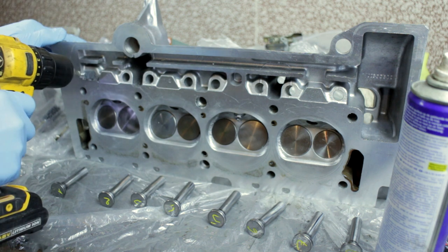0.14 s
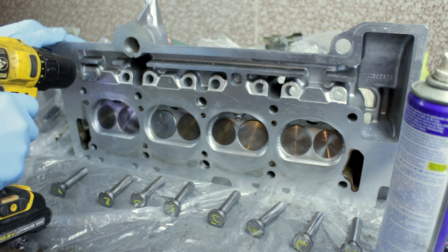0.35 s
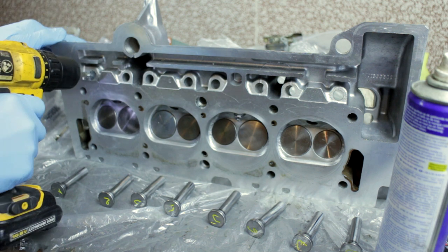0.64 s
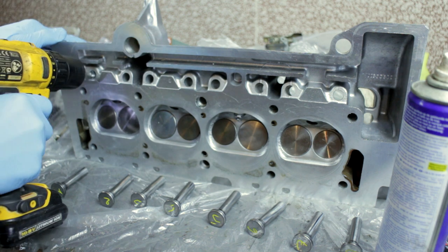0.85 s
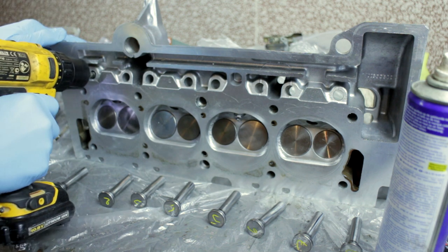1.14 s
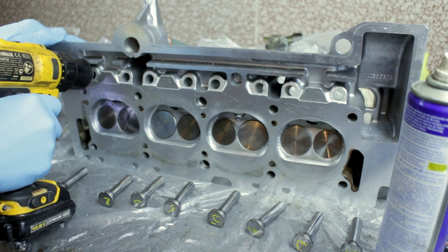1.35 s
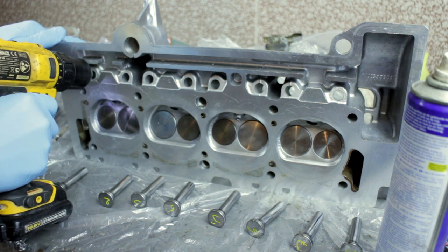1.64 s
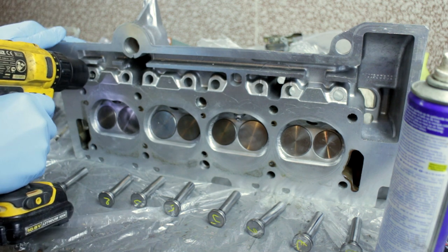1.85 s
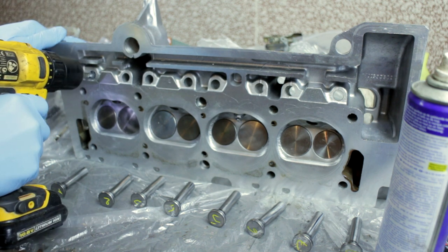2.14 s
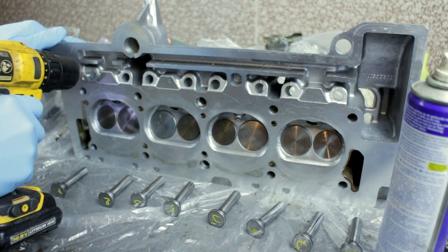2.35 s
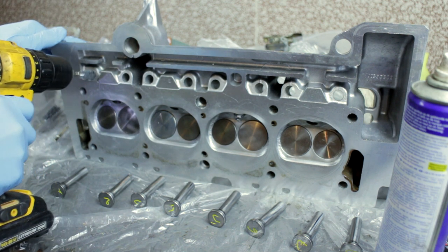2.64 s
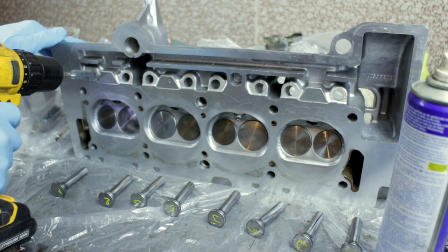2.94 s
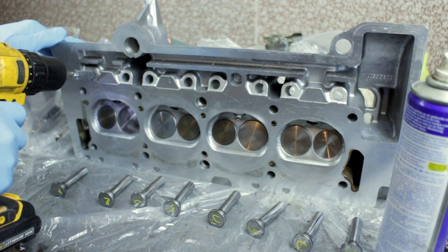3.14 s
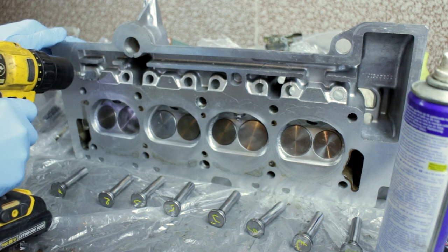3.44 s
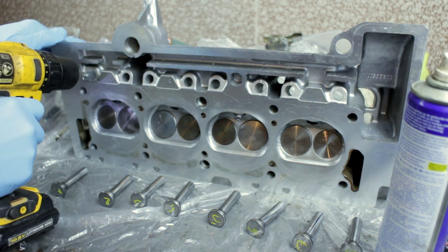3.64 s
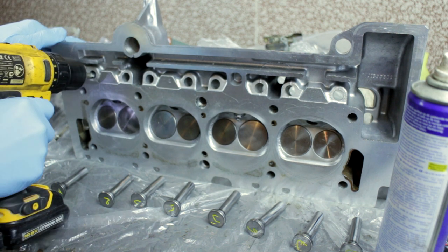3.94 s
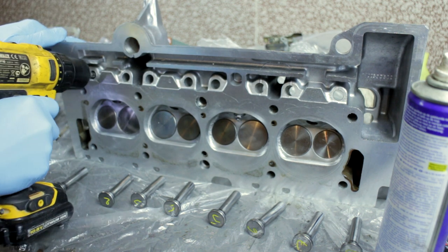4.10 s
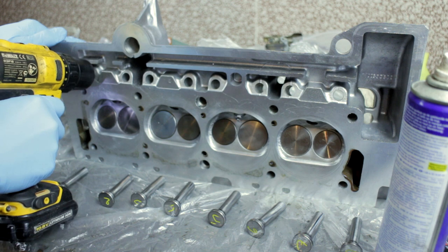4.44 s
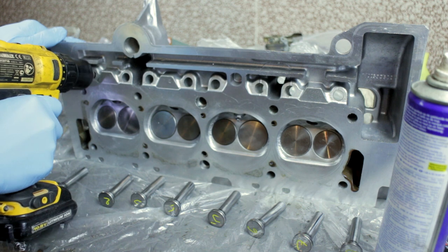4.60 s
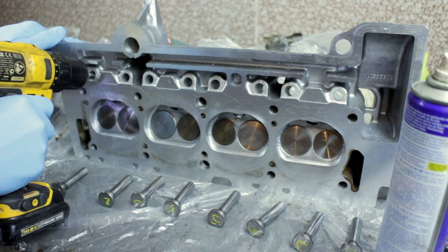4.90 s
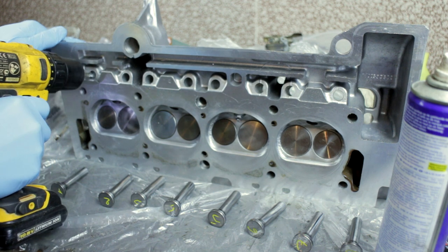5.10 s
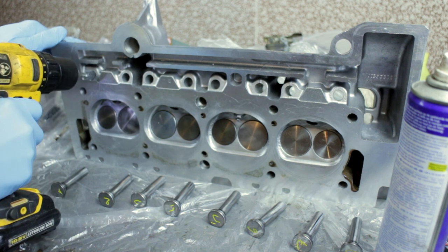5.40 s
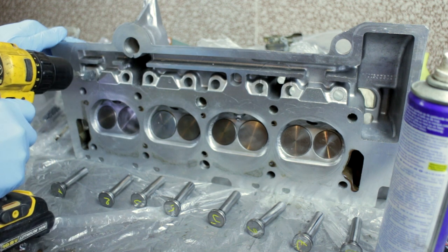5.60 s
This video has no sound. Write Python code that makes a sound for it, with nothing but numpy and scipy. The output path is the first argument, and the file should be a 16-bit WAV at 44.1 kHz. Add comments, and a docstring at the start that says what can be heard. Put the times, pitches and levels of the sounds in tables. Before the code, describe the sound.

A cordless drill runs a honing brush in an engine part, with rattling gears, scratchy scrubbing, thin squeals and one brief slowdown.

```python
"""Cordless drill honing a bore.

A drill spins an abrasive brush in a narrow bore of an aluminium cylinder head, on a workshop bench. The motor
revs up, settles, sags once as the brush is drawn back, and recovers; its planetary gears whine and rattle.
Bristles scrub the wall and ring the casting; the air in the bore squeals, gliding in pitch as the brush
travels, and brief gear and shaft whistles glide alongside. Mains hum lies underneath."""
import sys
import numpy as np
from scipy import signal
from scipy.fft import rfft, irfft, next_fast_len
from scipy.io import wavfile
from scipy.ndimage import uniform_filter1d

SR = 44100
rng = np.random.default_rng(int(sys.argv[2]) if len(sys.argv) > 2 else 0)


def put_to_file(sound):
    """Save the sound as 16-bit audio at rate SR, in the file named by the first command-line argument."""
    columns = np.atleast_2d(sound).T  # one column per channel
    safe = np.clip(columns, -1, 1)
    whole_steps = np.round(safe * 32767)
    wavfile.write(sys.argv[1], SR, whole_steps.astype(np.int16))


N = 253910
TIME_S = np.arange(N) / SR
TEETH_PER_TURN, CARRIER_PER_TURN = 11.138, .3125
WORKING_HZ = 184, 204  # shaft labouring, running free

# Motor shaft speed: time_s, shaft_hz
SHAFT_SPEED = [(0, 129.4), (.12, 130), (.18, 183), (.21, 187), (.235, 218), (.26, 244), (.29, 255),
               (.34, 260), (.39, 246), (.48, 213.4), (.61, 189.2), (.65, 185), (.69, 184.2), (1.32, 184.3),
               (1.39, 186.1), (1.46, 189.3), (1.56, 192), (1.69, 193.2), (1.79, 196.3), (2.04, 197.4),
               (2.43, 204.8), (2.53, 200.4), (2.62, 198.2), (2.88, 206.6), (2.96, 201.4), (3.21, 144.7),
               (3.29, 150.6), (3.43, 190.7), (3.6, 200.6), (3.68, 203.1), (4.17, 202.1), (4.51, 205.5),
               (4.72, 198.5), (5.05, 191.1), (5.33, 192.3), (5.52, 195.7), (5.64, 195.8), (5.76, 199.6)]
# Main whine, 3x shaft: time_s, level_db
MOTOR_WHINE = [(0, -74), (.14, -64), (.2, -43), (.27, -51.5), (.37, -53), (.41, -48), (.46, -46),
               (.65, -47), (.71, -55.5), (.8, -51.5), (.86, -62), (.97, -51.5), (1.07, -62), (1.17, -52.5),
               (1.27, -57), (1.35, -49), (1.46, -45), (1.55, -50.5), (1.88, -44.5), (2.28, -47),
               (2.39, -46.5), (2.51, -47), (2.94, -45), (3.25, -61), (3.44, -44), (3.49, -49.5),
               (3.58, -45), (4.61, -42.5), (4.7, -45), (4.92, -45.5), (4.96, -52.5), (5.01, -51),
               (5.29, -49), (5.37, -54), (5.61, -46), (5.76, -45.5)]
# Housing howl when racing, 9x shaft: start_s, end_s, level_db
HOWLS = [(0.22, 0.3, -47), (0.396, 0.445, -46.5)]
# Other motor tones: shaft_multiple, labouring_db, free_db, slack_db
SHAFT_TONES = [(1, -71, -72, -72), (2, -73, -73, -73), (4, -72, -62, -62), (5, -69, -64, -68),
               (6, -62, -63, -61.5), (7, -74, -70, -62), (8, -66, -65, -61), (9, -68, -67, -58),
               (10, -68, -64, -64), (13, -58, -64, -66), (15, -61, -60, -61), (16, -65, -64, -64),
               (18, -59, -60, -65), (19, -58, -64, -67), (21, -61, -63, -67), (23, -64, -62, -61),
               (24, -64, -58, -59), (25, -53.5, -51, -56.5), (26, -63, -64, -57), (27, -59, -59, -60),
               (28, -53, -60, -68), (29, -61, -59, -58), (30, -72, -70, -66), (31, -55, -59, -61),
               (33, -65, -62, -68), (34, -67, -65, -70), (35, -64, -68, -72), (36, -68, -70, -67),
               (38, -67, -69, -70), (54, -76, -71, -75), (57, -80, -68, -74), (60, -76, -66, -71),
               (66, -78, -72, -72)]
# Dip of the upper motor tones in the opening rev: start_s, end_s, gain_db
REV_DIP = [(.15, .66, -4.5)]
# Drill housing resonances and dips: centre_hz, width_hz, gain_db
HOUSING_MODES = [(230.8, 13.5, 13), (763, 37, -5), (893, 74, 6), (1034, 84, -5.5), (1310, 60, 5),
                 (2050, 370, 6.5), (5260, 75, 1.5), (5230, 67, 4), (5980, 50, 3.5)]
# Gear tones below and above the tooth rate, and at 12x shaft: time_s, lower_db, upper_db, twelfth_db
GEAR_TONES = [(0, -70, -71, -74), (.45, -58, -60, -56), (.57, -49, -55, -61), (.68, -46.5, -55, -58),
              (.9, -46.5, -45, -60), (1.05, -46.5, -47, -55), (1.25, -47.5, -46, -57),
              (1.37, -63, -49, -59), (1.58, -61, -52, -55), (1.8, -58, -48, -50), (1.96, -61, -57, -51),
              (2.09, -59, -49, -53), (2.3, -55, -59, -53), (2.42, -51, -61, -63), (2.65, -57, -66, -53),
              (3.0, -64, -67, -57), (3.22, -61, -65, -62), (3.5, -52, -62, -50), (3.75, -50.5, -57, -63),
              (3.97, -54, -54, -53), (4.2, -49, -50.5, -54), (4.48, -60, -60, -53), (4.65, -66, -55, -51),
              (4.93, -62, -49, -50), (5.07, -61, -53, -53), (5.37, -52, -54, -57), (5.5, -53, -66, -55),
              (5.76, -61, -60, -50)]
# Gearbox response: tooth_hz, mesh_db, overtone_db
GEARBOX_RESPONSE = [(1600, -50, -56), (2050, -49.5, -50.5), (2060, -52, -53), (2190, -61, -53),
                    (2240, -56, -52.5), (2320, -49, -56), (2550, -47, -48), (2900, -60, -53)]
# Mesh overtones split by the planets: tooth_multiple, carrier_steps, labouring_db, free_db
SIDEBANDS = [(2, -2, -6.5, -1.5), (2, 0, -1.5, .5), (2, 2, -10, -8), (3, -1, -13, -12), (3, 1, -17, -12),
             (3, 3, -17, -14)]
# Rattle at 1x, 2x, 3x tooth rate: width_hz, gain_db
RATTLE_BANDS = [(250, -4), (171, -8), (280, -16)]
# Gears slack, brush at the mouth: start_s, end_s, gain_db
SLACK_SPELLS = [(-.2, .18, -7.5), (2.76, 3.38, -10)]
# Brush binding: start_s, end_s, gain_db
BIND_SPELLS = [(.55, .65, 16), (1.96, 2.74, 10.5), (3.4, 4.2, 8), (5.08, 5.7, 8.5)]
# Bristles on the wall: time_s, pressure_db, fizz_db
SCRUB_LEVELS = [(0.0, -45.5, -52), (0.11, -43, -55), (0.29, -39, -47), (0.64, -41, -54.5),
                (0.79, -40, -53.5), (1.44, -40.5, -55.5), (1.59, -40, -52.5), (2.55, -41, -51),
                (3.15, -47, -56.5), (3.29, -44, -54.5), (3.48, -43, -55), (3.93, -40.5, -54.5),
                (4.46, -41, -60), (4.79, -40.5, -53), (5.52, -41.5, -53.5), (5.76, -44.5, -53)]
# Scrub spectrum: freq_hz, gain_db
SCRUB_SPECTRUM = [(150, -21), (320, -19.5), (430, -12), (600, -1.5), (800, -10), (920, -6), (1050, -11),
                  (1160, -5.5), (1350, -7), (1550, -2.5), (1780, -5), (2200, 2.5), (2700, -2), (3400, 1),
                  (3900, -1), (4400, -2), (4900, 0.5), (5150, 1), (5380, 3), (5650, -3.5), (6300, -9.5),
                  (8000, -9.5), (16000, -27.5)]
# Fizz spectrum: freq_hz, gain_db
FIZZ_SPECTRUM = [(4000, -45), (7000, -36), (10300, -3), (11700, 0), (12200, 3.5), (13000, 2.5),
                 (13700, 2.5), (16000, -2.5)]
# Spectra of bristle bite, commutator buzz, stem rub and shake: freq_hz, gain_db
BITE_SPECTRUM = [(3000, -47), (6700, 5.5), (8300, -4.5), (10500, -4), (12500, -12)]
BUZZ_SPECTRUM = [(6150, -16), (6600, -7), (7200, -11), (9500, -14), (11500, 3), (16000, 6)]
RUB_SPECTRUM = [(250, -37), (480, -6), (750, -6), (1700, -2.5), (2200, 5.5), (3000, -9), (4300, -19),
                (5600, 3.5), (7000, -14), (9000, -50)]
SHAKE_SPECTRUM = [(25, -28), (55, -18), (90, -8), (160, 10), (200, -4), (320, -2), (600, -36)]
# Gliding squeals: the air in the bore, plus a few brief gear and shaft whistles of like shape: start_s, end_s,
# from_hz, to_hz, width_hz, level_db
GLIDING_SQUEALS = [(-.05, .16, 1977, 1894, 30, -52.5), (-.05, 0.164, 2910, 2850, 60, -60.5),
                   (.22, 0.418, 2643, 3030, 70, -52.5), (.24, .39, 4700, 4980, 60, -45.5),
                   (.37, .475, 5400, 5000, 90, -47), (.34, .5, 2880, 2460, 70, -56),
                   (.51, 0.592, 3070, 3220, 35, -53), (.67, .86, 3330, 3260, 40, -58),
                   (.83, 1.0, 3310, 3330, 35, -52), (0.968, 1.09, 3320, 3180, 30, -53),
                   (1.13, 1.29, 3190, 3120, 50, -57), (1.078, 1.317, 1513, 1114, 55, -58),
                   (2.522, 2.826, 3285, 2110, 90, -55), (2.76, 2.94, 11100, 11100, 70, -63),
                   (2.796, 3.123, 2050, 1160, 55, -66), (3.489, 3.75, 2580, 3380, 80, -53.5),
                   (4.083, 4.26, 1390, 1126, 40, -61), (5.451, 5.796, 3410, 2236, 100, -55)]
# Casting modes that lift a passing squeal: centre_hz, width_hz, gain_db
CASTING_MODES = [(1210, 250, 10), (2450, 150, 11), (2850, 130, 8.5), (3200, 120, 4), (3550, 120, 7)]
# Brush deep in the bore: start_s, end_s, gain_db
DEEP_SPELLS = [(.62, 1.65, 5.5), (1.65, 2.15, 14), (2.15, 2.6, 10), (4.66, 5.3, 12.5), (5.28, 5.8, 7)]
# Low casting modes rung by the bristles: centre_hz, width_hz, level_db
LOW_MODES = [(1178, 36, -65.5), (1261, 58, -68)]


def gain_of(db):
    """Decibels to amplitude."""
    return 10 ** (np.asarray(db) / 20)


def unit_rms(x):
    """Scale to rms 1."""
    return x / np.sqrt(np.mean(x ** 2) + 1e-20)


def curves(rows):
    """Columns of a timed table, interpolated per sample."""
    time_s, *columns = np.transpose(rows)
    return [np.interp(TIME_S, np.sort(time_s), column) for column in columns]


def spells_db(rows, ramp_s=0.16):
    """Gain that ramps in and out round each spell."""
    return sum(db * np.clip(np.minimum(TIME_S - start_s, end_s - TIME_S) / ramp_s + .5, 0, 1)
               for start_s, end_s, db in rows)


def lift_db(hz, modes):
    """Gain of a tone passing through resonances."""
    return sum(db / (1 + (2 * (hz - centre_hz) / width_hz) ** 2) for centre_hz, width_hz, db in modes)


def wander(rate_hz):
    """Random drift up to about rate_hz; rms 1."""
    steps = rng.standard_normal(8192)
    return unit_rms(np.interp(TIME_S * 2 * rate_hz, np.arange(len(steps)), steps))


def coloured(x, spectrum):
    """Filter by a spectrum drawn over log frequency; rms 1."""
    hz, db = np.transpose(spectrum)
    size = next_fast_len(N)
    bins_hz = np.fft.rfftfreq(size, 1 / SR)
    response = gain_of(np.interp(np.log(bins_hz + 1), np.log(hz), db))
    return unit_rms(irfft(rfft(x, size) * response, size)[:N])


def ringing(hz, width_hz, steady=0):
    """Noise-driven resonance at hz, fixed or gliding; steady (0-1) limits its swings; rms 1."""
    if np.isscalar(hz):
        hz = np.full(N, hz)
    pole = np.exp(-np.pi * width_hz / SR)
    noise = (rng.standard_normal(N) + 1j * rng.standard_normal(N))[:len(hz)]
    envelope = signal.lfilter([1], [1, -2 * pole, pole * pole], noise)
    envelope /= abs(envelope) ** steady
    return unit_rms((envelope * np.exp(2j * np.pi * np.cumsum(hz) / SR)).real)


def tone(multiple, shaft_hz, turns, waver_db, waver_hz, modes=HOUSING_MODES, in_step=False):
    """Shaft-locked tone of wavering level; tones in step beat as pulses."""
    level_db = lift_db(multiple * shaft_hz, modes) + waver_db * wander(waver_hz)
    cycles = multiple * turns + rng.random() * (not in_step)
    return np.sqrt(2) * gain_of(level_db) * np.cos(2 * np.pi * cycles)


def motor(shaft_hz, turns, flutter_db=-19, howl_fade_s=0.011, judder_cycles=.07, switching_hz=7802):
    """Whine, howl bursts, shaft harmonics roughened by slack gears, and the controller's switching."""
    whine = tone(3, shaft_hz, turns, waver_db=1.36, waver_hz=25.84)
    whine += gain_of(flutter_db) * ringing(3 * shaft_hz, width_hz=47)
    whine *= gain_of(curves(MOTOR_WHINE)[0])
    bursts = sum(gain_of(db) * np.clip(np.minimum(TIME_S - start_s, end_s - TIME_S) / howl_fade_s, 0, 1)
                 for start_s, end_s, db in HOWLS)
    howl = bursts * tone(9, shaft_hz, turns, waver_db=2.5, waver_hz=90.6)
    sag_octaves = np.maximum(np.log2(np.median(shaft_hz) / shaft_hz), 0)
    slack = spells_db(SLACK_SPELLS) / spells_db(SLACK_SPELLS).min()
    judder = judder_cycles * slack * wander(70)
    harmonics = np.zeros(N)
    for k, labouring_db, free_db, slack_db in SHAFT_TONES:
        # Slack and slowing: low multiples of three last; unbalance (k <= 2) fades most.
        db_per_octave = 18 * min(k / 30, 1.5) ** 2 + 14 * (k % 3 > 0) + 36 * (k <= 2)
        idle_db = slack_db - sag_octaves * db_per_octave
        loaded_db = np.interp(shaft_hz, WORKING_HZ, [labouring_db, free_db])
        level_db = (1 - slack) * loaded_db + slack * idle_db
        if k > 20:
            level_db += spells_db(REV_DIP)
        harmonics += gain_of(level_db) * tone(k, shaft_hz, turns + judder / k, waver_db=2, waver_hz=7)
    switching = np.sqrt(2) * np.sin(2 * np.pi * switching_hz * TIME_S) * gain_of(-68.5 + 2 * wander(3))
    return whine + howl + harmonics + switching


def commutator(shaft_hz, turns, level_db=-59, size=1024):
    """Fine ticks repeat each turn: a drifting treble comb that fades as the shaft slows."""
    multiple = np.arange(size // 2 + 1)
    weights = (multiple > 31) * (multiple < 84) * (1 + 2 * np.exp(-abs(multiple - 32) / 4))
    patterns = irfft(weights * np.exp(2j * np.pi * rng.random((4, len(multiple)))))
    shares = np.array([wander(2) for _ in patterns])
    shares /= np.linalg.norm(shares, axis=0)
    ticks = sum(np.interp(turns % 1, np.arange(size) / size, pattern) * share
                for pattern, share in zip(patterns, shares))
    fade = np.minimum(shaft_hz / np.median(shaft_hz), 1) ** 3
    return gain_of(level_db) * fade * coloured(ticks, BUZZ_SPECTRUM)


def gear_whine(shaft_hz, turns):
    """Three tones near the tooth rate beat into a rasp; load shifts strength among them."""
    multiples = TEETH_PER_TURN - CARRIER_PER_TURN, TEETH_PER_TURN + CARRIER_PER_TURN, 12
    return sum(gain_of(db) * tone(k, shaft_hz, turns, waver_db=0.8, waver_hz=18, modes=[], in_step=True)
               for k, db in zip(multiples, curves(GEAR_TONES)))


def planetary_gears(shaft_hz, turns, sideband_db=-3, knock_db=-19, bind_share=0.61, pulse_depth=0.31):
    """Pulsing rattle, split overtones and a rough haze of lines at carrier spacing round the tooth rate;
    binding lifts the upper bands."""
    tooth_hz = TEETH_PER_TURN * shaft_hz
    response_hz, *responses_db = np.transpose(GEARBOX_RESPONSE)
    slack_db, bind_db = spells_db(SLACK_SPELLS), spells_db(BIND_SPELLS)
    mesh_db, overtone_db = [np.interp(tooth_hz, response_hz, db) + slack_db for db in responses_db]
    pulsing = unit_rms(1 + pulse_depth * np.cos(2 * np.pi * 2 * CARRIER_PER_TURN * turns))
    rattle, sidebands, knock = np.zeros((3, N))
    for k, (width_hz, db) in enumerate(RATTLE_BANDS, 1):
        band_db = mesh_db if k == 1 else overtone_db + bind_db
        rattle += gain_of(band_db + db) * pulsing * ringing(k * tooth_hz, width_hz)
    for k, step, *working_db in SIDEBANDS:
        multiple = k * TEETH_PER_TURN + step * CARRIER_PER_TURN
        load_db = overtone_db + bind_share * bind_db + np.interp(shaft_hz, WORKING_HZ, working_db)
        line = tone(multiple, shaft_hz, turns, waver_db=0.8, waver_hz=30, in_step=True)
        sidebands += gain_of(load_db + sideband_db) * line
    for step in range(-7, 8):
        multiple = TEETH_PER_TURN + step * CARRIER_PER_TURN
        knock += gain_of(mesh_db + knock_db) * tone(multiple, shaft_hz, turns, waver_db=3, waver_hz=6)
    return rattle + sidebands + knock


def brush(turns, throb_depth=0.036, catch_db=0.55, grit_db=1, bite_exponent=5.1):
    """Grit contacts scrub the wall, throbbing with the gearbox and catching unevenly."""
    pressure_db, fizz_db = curves(SCRUB_LEVELS)
    slack_db = spells_db(SLACK_SPELLS)
    throb = 1 + throb_depth * np.cos(2 * np.pi * 2 * CARRIER_PER_TURN * turns)
    grip = throb * gain_of(catch_db * wander(25))
    contacts = rng.standard_normal((3, N)) * grip * gain_of(grit_db * wander(700))
    scrub = gain_of(pressure_db - 1.5 + 0.11 * slack_db) * coloured(contacts[0], SCRUB_SPECTRUM)
    fizz = gain_of(fizz_db) * coloured(contacts[1], FIZZ_SPECTRUM)
    median_db = np.median(pressure_db)
    bite_db = median_db - 15 + bite_exponent * (pressure_db - median_db)
    bite = gain_of(bite_db) * coloured(contacts[2], BITE_SPECTRUM)
    rasp = gain_of(pressure_db - 14 + slack_db) * ringing(4400, width_hz=660)
    return scrub + fizz + bite + rasp


def stem(stroke_s=3.12, deepest_s=2.04):
    """The stem rubs the bore's mouth, most on the pull, and shakes casting and housing, most when deep."""
    stroke_rad = 2 * np.pi * (TIME_S - deepest_s) / stroke_s
    pressure_db = curves(SCRUB_LEVELS)[0]
    rub_db = -51 + 3 * np.sin(stroke_rad)
    shake_db = -75.5 + 4.5 * np.cos(stroke_rad) + pressure_db - np.median(pressure_db)
    friction = rng.standard_normal((2, N))
    rub = coloured(friction[0], RUB_SPECTRUM)
    shake = coloured(friction[1], SHAKE_SPECTRUM)
    housing_hz, width_hz, _ = HOUSING_MODES[0]
    housing = gain_of(-1) * ringing(housing_hz, width_hz)
    return gain_of(rub_db) * rub + gain_of(shake_db) * (shake + housing)


def gliding_squeals(trim_db=-1, fade_s=0.027, scratch_db=4.5, scratch_hz=120):
    """Scrubbing sounds the air column: glides as the brush travels, scratchy as bristles catch; a few brief
    gear and shaft whistles glide alike."""
    squeals = np.zeros(N)
    catching = unit_rms(gain_of(scratch_db * np.tanh(wander(scratch_hz))))
    for start_s, end_s, from_hz, to_hz, width_hz, db in GLIDING_SQUEALS:
        during = (TIME_S > start_s) & (TIME_S < end_s)
        t = TIME_S[during]
        hz = from_hz * (to_hz / from_hz) ** ((t - start_s) / (end_s - start_s))
        envelope = np.minimum(np.minimum(t - start_s, end_s - t) / fade_s, 1)
        level_db = db + trim_db + lift_db(hz, CASTING_MODES)
        squeals[during] += envelope * gain_of(level_db) * ringing(hz, width_hz, steady=0.8)
    return squeals * catching


def mains_hum(hz=50, level_db=-77):
    """Steady sine at the mains frequency."""
    return gain_of(level_db) * np.sqrt(2) * np.sin(2 * np.pi * hz * TIME_S)


def racing_chatter(shaft_hz, onset_hz=205):
    """Above working speed the drill chatters in two broad bands."""
    excess = np.clip((shaft_hz - onset_hz) / (shaft_hz.max() - onset_hz), 0, 1)
    body = gain_of(-47) * ringing(2100, width_hz=450)
    shell = gain_of(-46) * ringing(5100, width_hz=680)
    return np.sqrt(excess) * (body + shell)


def casting_ring():
    """Deep bristles ring two low modes and add thin hiss; binding rings a higher mode."""
    low = sum(gain_of(db) * ringing(hz, width_hz, steady=0.26) for hz, width_hz, db in LOW_MODES)
    binding = gain_of(-64 + spells_db(BIND_SPELLS)) * ringing(1965, width_hz=115)
    hiss = gain_of(-75) * ringing(8350, width_hz=1400)
    return gain_of(spells_db(DEEP_SPELLS)) * (low + hiss) + binding


def workshop(x, t60_s, wet_db):
    """Add a short diffuse tail from bench and walls."""
    t = np.arange(SR // 2) / SR
    tail = rng.standard_normal(len(t)) * gain_of(-60 * t / t60_s) * (t > .003)
    return x + gain_of(wet_db) * signal.fftconvolve(x, tail / np.linalg.norm(tail))[:N]


def scene():
    """One shaft drives motor, gears and brush; both channels alike."""
    shaft_hz = uniform_filter1d(curves(SHAFT_SPEED)[0], size=900) * (1 + .0007 * wander(30))
    turns = np.cumsum(shaft_hz) / SR
    drive = commutator(shaft_hz, turns) + gear_whine(shaft_hz, turns)
    drive += planetary_gears(shaft_hz, turns) + racing_chatter(shaft_hz)
    honing = brush(turns) + stem() + gliding_squeals() + casting_ring()
    mono = workshop(drive + honing, t60_s=0.16, wet_db=-13)
    mono += workshop(motor(shaft_hz, turns), t60_s=0.38, wet_db=-17) + mains_hum()
    return np.array([mono, mono])


def record(dry):
    """Steep low-pass."""
    lowpass = signal.firwin(511, cutoff=15850, window=("kaiser", 9), fs=SR)
    return signal.oaconvolve(dry, lowpass[None], "same")


dry = scene()
out = record(dry)
put_to_file(out)
```